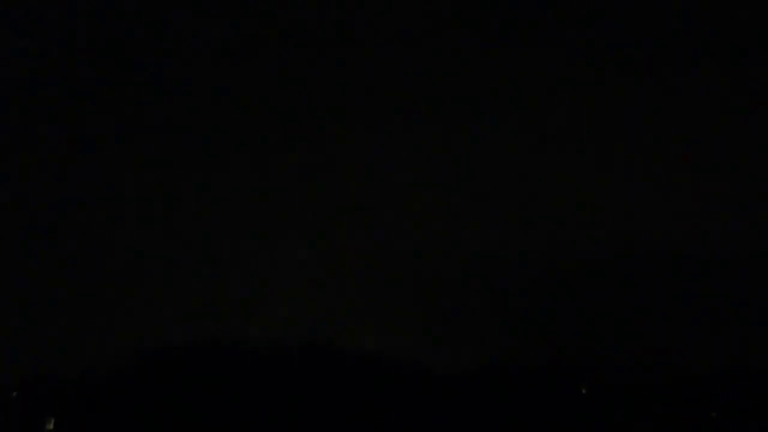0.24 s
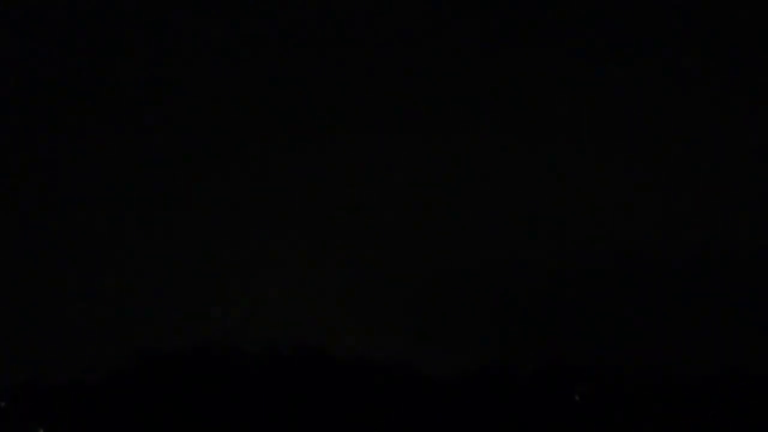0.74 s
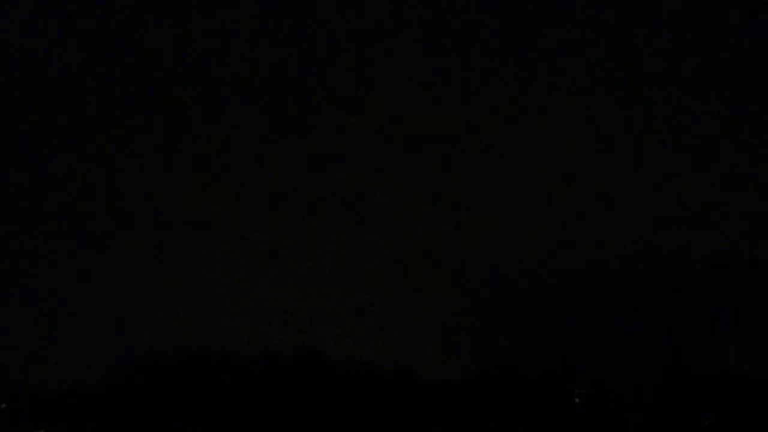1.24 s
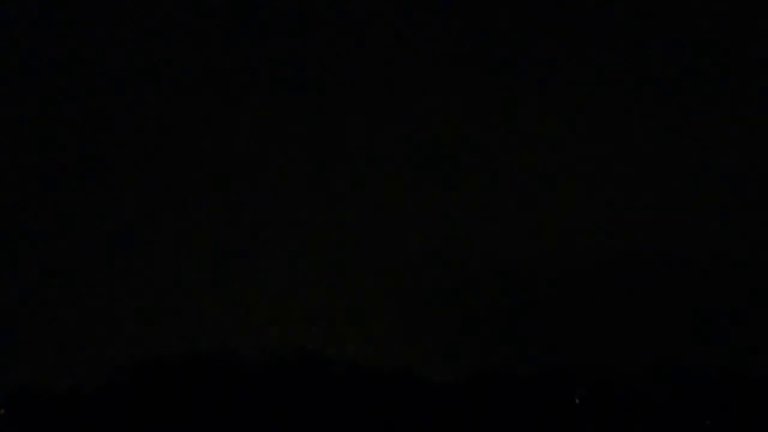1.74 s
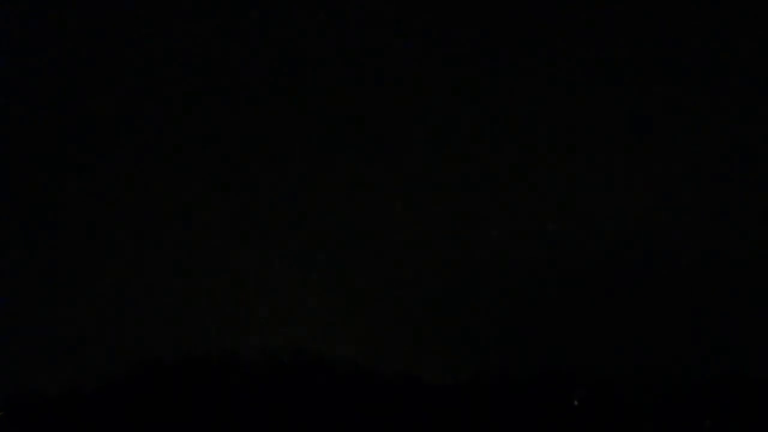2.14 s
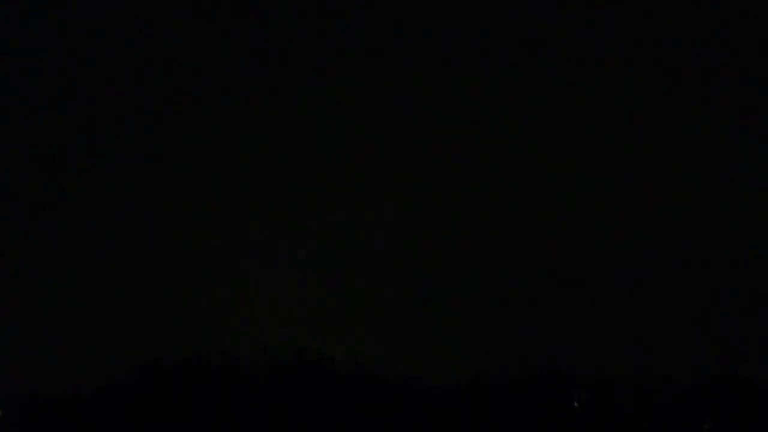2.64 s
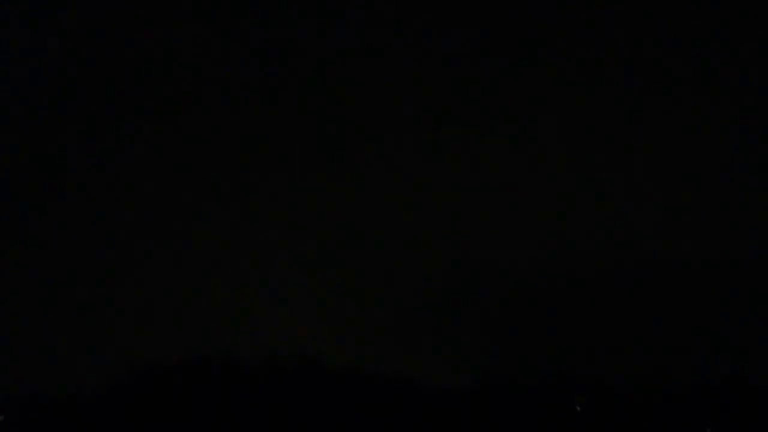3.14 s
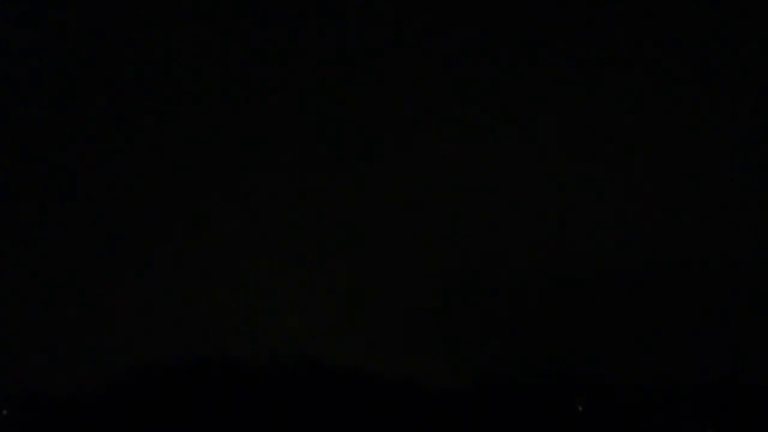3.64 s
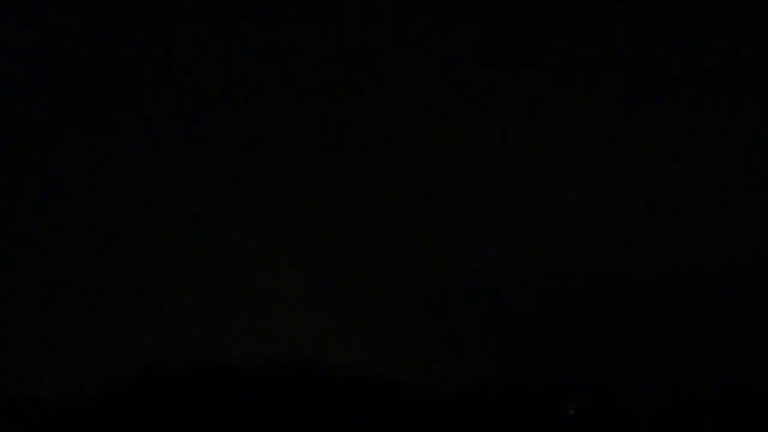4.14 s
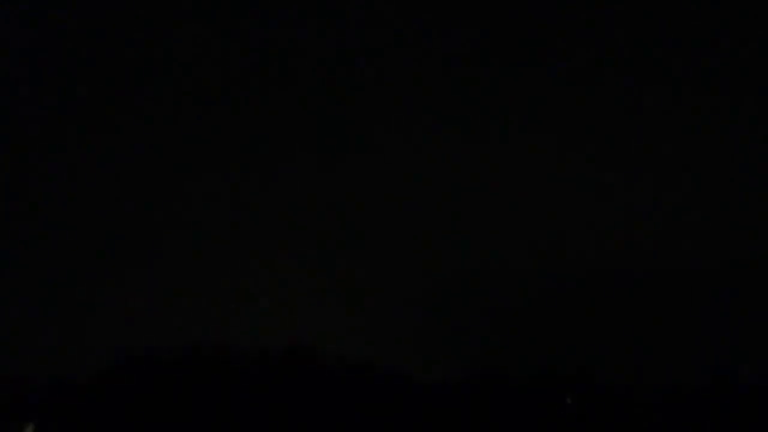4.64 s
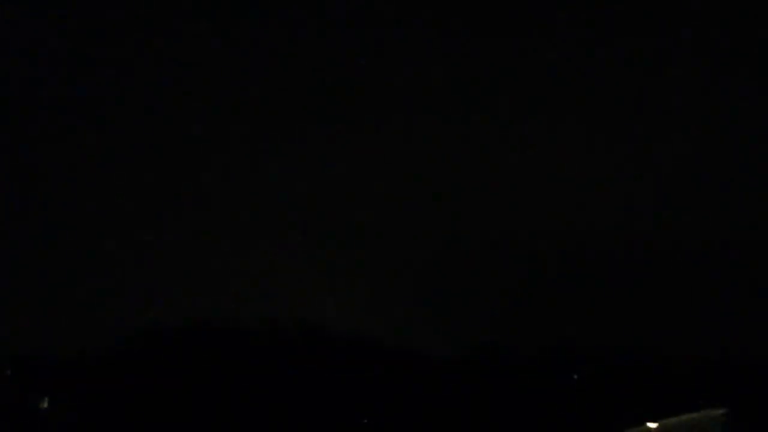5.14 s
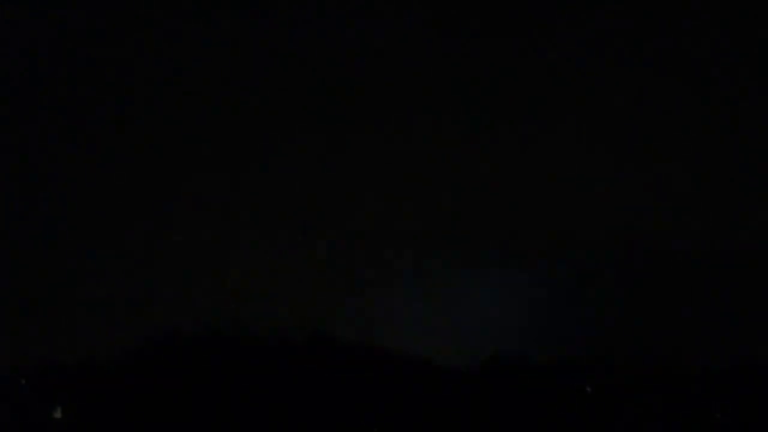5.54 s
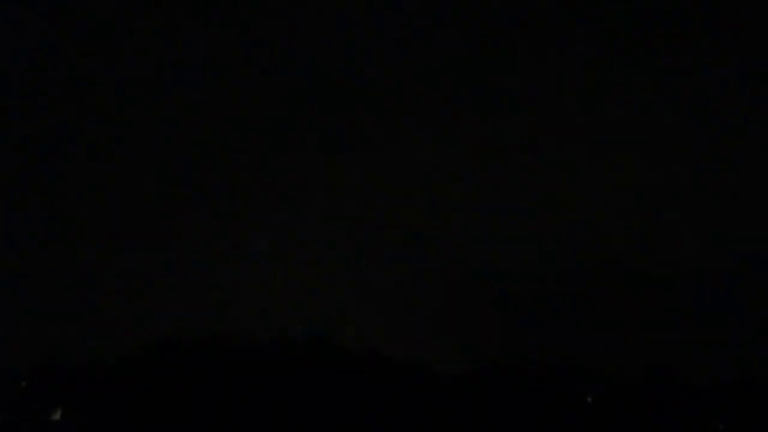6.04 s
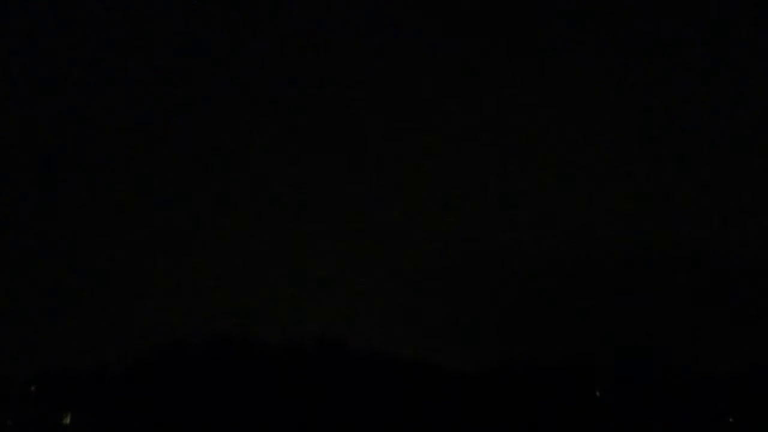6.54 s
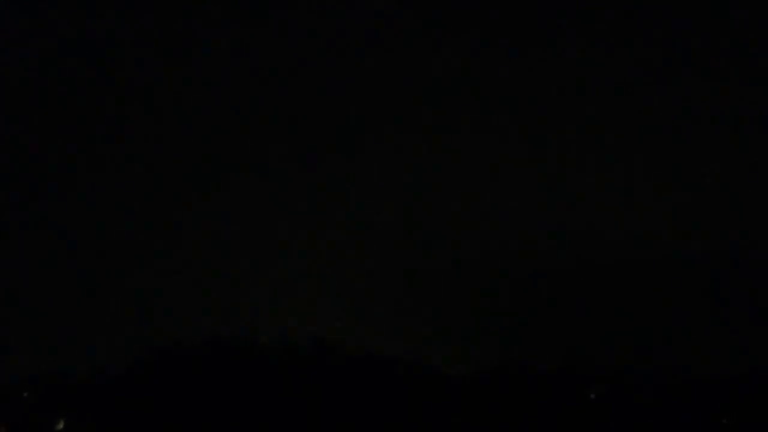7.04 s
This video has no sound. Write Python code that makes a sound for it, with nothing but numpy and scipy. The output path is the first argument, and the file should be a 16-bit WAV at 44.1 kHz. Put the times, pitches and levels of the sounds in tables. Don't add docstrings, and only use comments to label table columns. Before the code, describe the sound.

A bush cricket close to the microphone keeps up a fast, even, high-pitched rasp in open night air. Behind it, deep muffled thunder rolls continuously in three swells: an early burst of booms, a milder middle one, and a strongest late one that dies to a rumble. Faint wash of air and leaves, steady hiss, occasional small ticks, drips and a dull knock on a hard casing.

```python
import sys
import numpy as np
from scipy import signal
from scipy.io import wavfile
from scipy.ndimage import uniform_filter1d

SR = 44100
rng = np.random.default_rng(int(sys.argv[2]) if len(sys.argv) > 2 else 0)


def elevation(decibels):
    levels = np.asarray(decibels, float)
    return 10 ** (levels / 20)


def int16_out(signal):
    q = np.round(np.clip(np.atleast_2d(signal).T, -1, 1) * 32767)
    wavfile.write(sys.argv[1], SR, q.astype(np.int16))


N = 322357


def evened(x):
    return x / np.sqrt(np.mean(x ** 2) + 1e-20)


def coloured(x, spectrum):
    f, db = np.transpose(spectrum)
    bins_hz = np.fft.rfftfreq(16384, 1 / SR)
    half_db = np.interp(np.log(bins_hz + 1), np.log(f + 1), db, -100, -100)
    log_gain = np.log(elevation(np.r_[half_db, half_db[-2:0:-1]]))
    response = np.exp(np.conj(signal.hilbert(log_gain)))
    taps = np.fft.ifft(response).real[:8192]
    return evened(signal.oaconvolve(x, taps)[:N])


def band(x, lo_hz, hi_hz):
    sections = signal.butter(2, [lo_hz, hi_hz], "band", fs=SR, output="sos")
    return evened(signal.sosfilt(sections, x))


def resonate(x, hz, width_hz):
    r = np.exp(-np.pi * width_hz / SR)
    return 2 * signal.lfilter([1 - r], [1, -r * np.exp(2j * np.pi * hz / SR)], x).real


def ring(hz, t60, rise=0.0001, glide=0.):
    t = np.arange(SR // 4) / SR
    tone = np.sin(2 * np.pi * hz * t * (1 - glide * np.exp(-t / 0.0024)))
    return tone * elevation(-60 * t / t60) * np.tanh(t / rise)


def add(mix, s, sound):
    part = mix[round(s * SR):][:len(sound)]
    part += sound[:len(part)]


def echoes(x, t60, start, seconds=1):
    t = np.arange(seconds * SR) / SR
    arrivals = rng.random(len(t)) < .05
    taps = rng.standard_normal(len(t)) * arrivals * elevation(-60 * t / t60) * (t > start)
    return signal.fftconvolve(x, taps / np.linalg.norm(taps))[:N]


# t/s, level/dB
WASH_SWELL = [(0.0, -61), (1.3, -60.5), (2.08, -57.5), (2.85, -60.5), (3.77, -62), (4.34, -60.5),
              (4.89, -61.5), (5.46, -60.5), (7.31, -61.5)]
# f/Hz, level/dB per Hz
WASH_SPECTRUM = [(350, -33), (600, -1.5), (788, -4), (1500, -9.5), (1630, -8.5), (3720, -18), (7010, -28),
                 (8410, -53), (9000, -19.5), (11700, -50), (19800, -120)]
# f/Hz, level/dB per Hz
HISS_SPECTRUM = [(2500, 2), (5000, 1), (9000, 2), (12500, 5.5), (14500, -0.5), (16500, -2)]
# f/Hz, level/dB
WHINE = [(7687, -95), (7747, -73)]


def wash():
    s, db = np.transpose(WASH_SWELL)
    flutter = evened(uniform_filter1d(rng.standard_normal(N), 1500))
    level_db = np.interp(np.arange(N) / SR, s, db) + 5.5 + 0.69 * flutter
    far = elevation(level_db) * coloured(rng.standard_normal(N), WASH_SPECTRUM)
    hiss = elevation(-58.5) * coloured(rng.standard_normal(N), HISS_SPECTRUM)
    tones = np.zeros(N)
    for hz, db in WHINE:
        tones += elevation(db - 8.0) * evened(resonate(rng.standard_normal(N), hz, 3.9))
    return far + hiss + tones


# f/Hz, level/dB, t60/s
CASING = [(900, -1, .06), (1350, -7, .025), (2110, 0, .032), (3300, -7, .012), (4600, -11, .012)]
# t/s, peak level/dB, brightness/0-1
KNOCKS = [
    (3.361, -34.5, 0.1),
    (3.382, -41, 0.1),
    (3.412, -45, 0.6),
    (3.432, -47, 0.4),
    (5.766, -37, 0.4),
    (5.774, -58, 0.5),
]


def knocks():
    out = np.zeros(N)
    t = np.arange(2000) / SR
    for s, db, bright in KNOCKS:
        tilt_db = 14 * (bright - .5)
        for hz, mode_db, t60 in CASING:
            level_db = db - 7.5 + mode_db + tilt_db * np.log2(hz / 1800)
            add(out, s, elevation(level_db) * ring(hz, t60))
        click = band(np.exp(-t / .00006), 600, 3800)
        add(out, s, elevation(db + tilt_db - 23) * click)
        rattle = band(rng.standard_normal(2000), 720, 1000)
        add(out, s, elevation(db - 7 - 60 * t / 0.13) * rattle * np.hanning(4000)[2000:])
    return out


# t/s, peak level/dB, f/Hz, t60/s
DRIPS = [(.5917, -51, 3380, 0.023), (1.26, -52, 8000, .02), (2.072, -56.5, 8200, .02),
         (3.172, -53, 4200, .03), (3.427, -55.5, 5600, .02), (4.74, -52, 2390, 0.036),
         (5.1988, -45, 3850, .015), (5.2, -43.5, 4600, 0.03), (5.199, -50, 8600, .015),
         (5.2045, -50.5, 4450, 0.023), (5.222, -57, 4700, .02), (6.172, -53, 5000, 0.032),
         (6.173, -45, 8300, 0.012), (6.61, -56, 7500, 0.017)]


def drips():
    out = np.zeros(N)
    t = np.arange(2000) / SR
    for s, db, hz, t60 in DRIPS:
        splash = evened(resonate(resonate(rng.standard_normal(2000), hz, 1000), hz, 1000))
        tone = ring(hz, .5 * t60, glide=0.04)[:2000]
        add(out, s, elevation(db - 60 * t / t60) * splash + elevation(db + 3) * tone)
    return out


def ticks():
    near = knocks() + drips()
    return near + elevation(-9) * echoes(near, .12, .003)


CHIRP_S, FIRST_END_S = .11383, -0.017
SECOND_S, SECOND_DB = 0.04, -0.2
SCATTER_S, SCATTER_DB = 0.00099, 0.62
# t/s, lateness/ms, effort level/dB
TEMPO = [(0, -8, -45), (.1, 0.5, -43.5), (.78, 2.5, -42), (1.12, -2.5, -42.8), (1.46, -2, -42),
         (2.83, 2, -42.6), (3.4, 0, -41.5), (4.08, 3.5, -40.8), (4.31, 2.5, -40), (4.65, 4.5, -42),
         (4.99, -3, -40), (5.3, -3.5, -41), (5.5, 2.5, -42), (5.75, 2.5, -42.1), (6.24, -2, -41.5),
         (6.6, 0, -42.5), (6.81, -2, -42.5), (7.04, -1.5, -42)]


def chirps():
    beat = FIRST_END_S + np.arange(0, N / SR + CHIRP_S, CHIRP_S)
    s, late_ms, effort_db = np.transpose(TEMPO)
    chance = rng.standard_normal((len(beat), 4))
    db = np.interp(beat, s, effort_db)
    first_end = beat + np.interp(beat, s, late_ms) / 1000 + .5 * SCATTER_S * chance[:, 0]
    first_db = db + SCATTER_DB * chance[:, 1]
    gap = SECOND_S + SCATTER_S * chance[:, 2]
    second_db = db + SECOND_DB + SCATTER_DB * chance[:, 3]
    return zip(first_end, first_db, gap, second_db)


# t/s relative to its end, level/dB
FIRST_STROKE = [(-.02, -26), (-.016, -12), (-.0125, -4), (-.005, 1), (-.0008, -1), (0, -30)]
# t/s relative to its end, level/dB
SECOND_STROKE = [(-.034, -19), (-.023, -12), (-.018, -6), (-.011, 0), (-.0008, -1.5), (0, -30)]


def stroke_force():
    t, force = np.arange(N) / SR, np.zeros(N)
    for end, first_db, gap, second_db in chirps():
        for shape, at, db in ((FIRST_STROKE, end, first_db), (SECOND_STROKE, end + gap, second_db)):
            start = max(round((at - .04) * SR), 0)
            stop = min(max(round(at * SR), 0), N)
            near = slice(start, stop)
            before, level_db = np.transpose(shape)
            force[near] += elevation(np.interp(t[near] - at, before, level_db, -90) + db)
    return force


def scraping():
    waver = evened(uniform_filter1d(rng.standard_normal(N), 60))
    teeth_per_s = 980 * (1 + .25 * waver)
    strikes = np.diff(np.floor(np.cumsum(teeth_per_s) / SR), prepend=0)
    teeth = strikes * elevation(1.9 * rng.standard_normal(N))
    return evened(teeth - teeth.mean()) + .45 * rng.standard_normal(N)


# f/Hz, width/Hz, level/dB
WING_MODES = [(9730, 260, -14), (10330, 460, 0), (10800, 180, -8), (11240, 500, -2.5), (11900, 450, -17)]
# f/Hz, level/dB per Hz
SCRAPER_SPECTRUM = [(2000, -36), (4000, -20), (8500, -21), (9250, -10), (9600, -12), (10700, -11),
                    (12300, -6), (12950, -9), (13450, -20), (13850, -11), (14250, -10), (14600, -15),
                    (15700, -10), (17000, -20)]


def cricket():
    force = stroke_force()
    drive = scraping() * force
    wing = np.zeros(N)
    for k, (hz, width_hz, db) in enumerate(WING_MODES):
        mode = resonate(resonate(drive, hz, width_hz), hz, width_hz)
        wing += (-1) ** k * elevation(db) * mode
    song = np.std(force) * (evened(wing) + elevation(-8.5) * coloured(drive, SCRAPER_SPECTRUM))
    returned = echoes(np.std(song) * band(song, 8000, 13000), 0.31, 0.0091)
    return elevation(2.5) * song + elevation(-7.0) * returned


def rolling(x, lo_hz, hi_hz, level_db, fill=0.3):
    part = band(x, lo_hz, hi_hz)
    power = signal.oaconvolve(part ** 2, np.hanning(3000) / 1500, "same")
    lumps = np.sqrt(power.clip(1e-3))
    return elevation(level_db) * evened(part / lumps ** np.clip(fill, 0, 1))


ROLL_MID_DB, ROLL_MID_HZ = -37, 210
RISE_S, FALL_DB_PER_S = .008, 300
UNDER_DB, OVER_DB = 0, 2
# t/s, level/dB, sharpness/dB per octave
ROLL = [(0, -34.5, 4.5), (.14, -38, 4.5), (.5, -42, 5), (.62, -33, 3.5), (.92, -36.5, 3), (1.35, -35.5, 2),
        (1.8, -40.5, 2.5), (2.2, -37, -0.5), (2.72, -39, -0.5), (3.2, -37.5, 0.5), (3.6, -29.5, -2),
        (4.18, -34, -1), (4.27, -39.5, 0.5), (5.0, -36, -1), (5.85, -33.5, -0.5), (6.1, -28, 0),
        (6.5, -27, -4), (7.31, -39.5, -3)]
# t/s, level/dB, hold/s, centre f/Hz
SURGES = [(0.0, -33.5, 0.046, 250), (0.247, -36, 0.045, 90), (0.35, -36.5, 0.097, 300),
          (0.56, -35, 0.028, 280), (0.642, -29, 0.078, 180), (0.763, -25.5, 0.092, 160),
          (0.991, -30.5, 0.095, 260), (1.176, -37, 0.024, 130), (1.385, -31, 0.12, 120),
          (1.605, -33, 0.047, 200), (1.717, -38.5, 0.076, 80), (1.847, -32.5, 0.11, 139),
          (2.002, -27.5, 0.01, 200), (2.272, -32, 0.022, 180), (2.42, -38, 0.15, 80),
          (3.063, -37, 0.03, 170), (3.22, -39, 0.13, 190), (3.43, -39, .04, 200), (3.75, -30, .06, 110),
          (3.912, -38.5, 0.033, 130), (4.037, -40, 0.071, 120), (4.306, -43, 0.073, 100),
          (4.455, -38.5, 0.027, 180), (4.72, -43, 0.016, 200), (5.315, -35, 0.043, 130),
          (5.908, -26, 0.13, 300), (6.144, -27.5, 0.11, 250), (6.305, -23, 0.12, 230),
          (6.482, -26.5, .09, 200), (6.874, -33, 0.027, 130)]


def roll_db(hz, share):
    t = np.arange(0, N / SR + .01, .002)
    s, level_db, sharp_db = np.transpose(ROLL)
    power = elevation(2 * np.interp(t, s, level_db))
    for start, db, hold, centre_hz in SURGES:
        fall_db = FALL_DB_PER_S * np.maximum(t - start - hold, 0)
        off_db = max(UNDER_DB * np.log2(centre_hz / hz), OVER_DB * np.log2(hz / centre_hz))
        rise = np.clip((t - start) / RISE_S + .5, 0, 1)
        power = power + (rise * elevation(db - fall_db - off_db)) ** 2
    swing_db = 10 * np.log10(power) - ROLL_MID_DB
    tilt_db = np.interp(t, s, sharp_db) * max(np.log2(hz / ROLL_MID_HZ), 0)
    return np.interp(np.arange(N) / SR, t, ROLL_MID_DB + share * swing_db + tilt_db)


# f/Hz, level/dB per Hz
THUNDER_SPECTRUM = [(8, -50), (25, -24), (70, -5), (120, 0), (220, 0), (320, -5), (500, -16), (800, -26),
                    (1500, -44), (3300, -100)]
# low f/Hz, high f/Hz, level/dB, share of the swings followed/0-1
LAYERS = [
    (24.1, 83.5, -7, 0.58),
    (121.3, 373, -3.5, 1.0),
    (348.5, 894, -11, 1),
    (703, 1800, -21.5, 0.32),
]
# t/s, peak level/dB, ringing f/Hz, t60/s
CLAPS = [(0.566, -18, 215, 0.11), (0.639, -10.5, 209.6, 0.16), (0.667, -14, 205, 0.34),
         (0.772, -6, 211.2, 0.27), (0.82, -5, 111, 0.2), (1.02, -13, 270, 0.22), (1.421, -22, 75, 0.2),
         (1.71, -20, 78, .15), (2.275, -19, 185, .1), (3.045, -20, 162, .15), (3.225, -20, 205, 0.19),
         (3.551, -21.5, 182, 0.6), (3.766, -16.5, 105, .2), (3.915, -26, 131, 0.2),
         (4.029, -17.5, 169.3, 0.23), (4.075, -22, 60, 0.17), (4.289, -20, 99, 0.19), (5.33, -18, 118, .15),
         (6.135, -12, 91, 0.18), (5.906, -9, 289, 0.086), (5.998, -13, 113, 0.23), (6.05, -16, 272.8, 0.49),
         (6.152, -1.5, 238, 0.08), (6.138, -10, 171, 0.11), (6.304, -3, 256, 0.046),
         (6.339, -0.5, 142, 0.13), (6.391, 0, 192, 0.075), (6.447, -13, 279, 0.068),
         (6.496, -14, 208, 0.13)]


def thunder():
    arrivals = rng.random(N) < 500 / SR
    strength = elevation(3.55 * np.minimum(rng.exponential(1, N), 4))
    shocks = arrivals * strength * rng.choice([-1, 1], N)
    path = coloured(evened(shocks) + 1.62 * rng.standard_normal(N), THUNDER_SPECTRUM)
    roll = np.zeros(N)
    for k, (lo, hi, db, share) in enumerate(LAYERS):
        level_db = db + roll_db(np.sqrt(lo * hi), share)
        roll += (-1) ** k * rolling(path, lo, hi, level_db)
    for s, db, hz, t60 in CLAPS:
        boom = ring(hz, t60, rise=0.0015)
        overtone = ring(1.9 * hz, 0.38 * t60, rise=0.0028)
        add(roll, s, elevation(db - 11.0) * (boom + elevation(-10) * overtone))
    return roll


def scene():
    return (wash() + ticks() + cricket() + thunder())[None]


def low_pass(x):
    return signal.sosfilt(signal.butter(12, 16460, fs=SR, output="sos"), x)


def record(dry):
    edge = signal.firwin(801, 15790, window=("kaiser", 10), fs=SR)
    mix = signal.oaconvolve(dry, edge[None], "same")
    return low_pass(mix)


dry = scene()
out = record(dry)
int16_out(out)
```